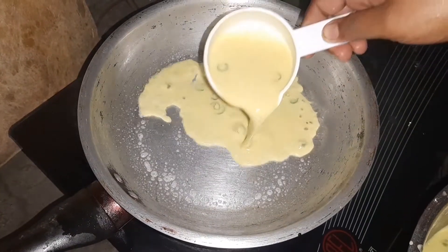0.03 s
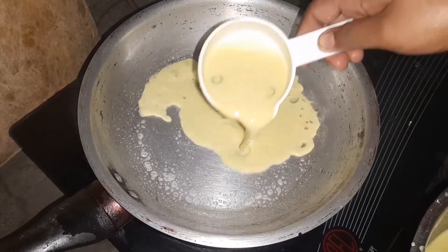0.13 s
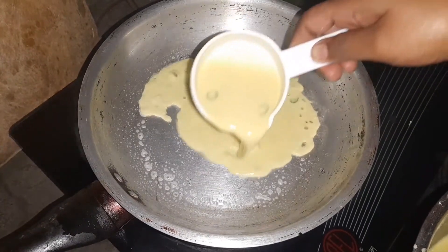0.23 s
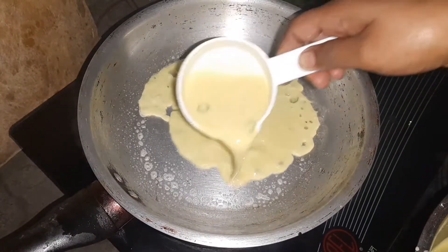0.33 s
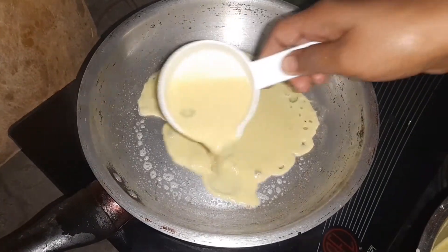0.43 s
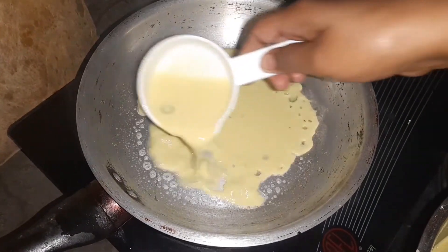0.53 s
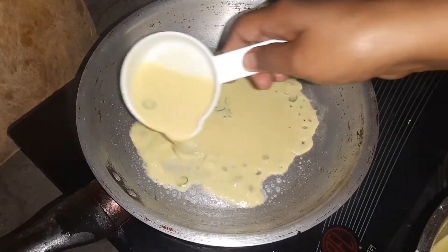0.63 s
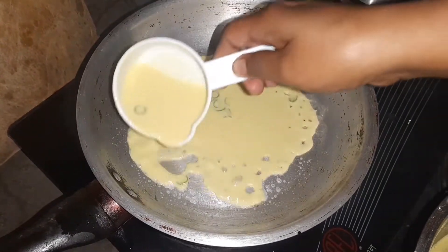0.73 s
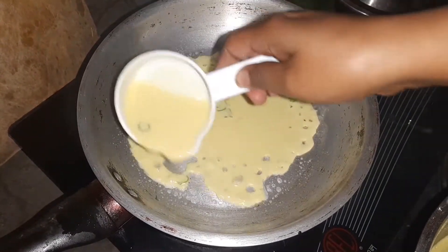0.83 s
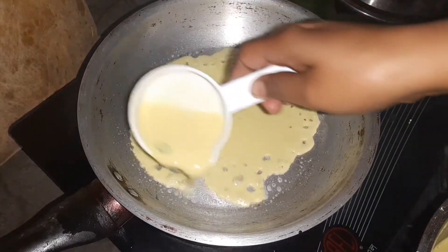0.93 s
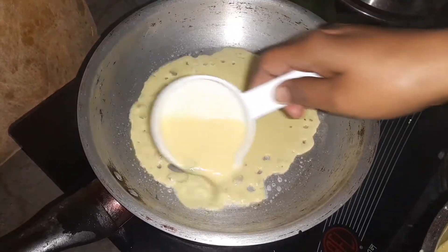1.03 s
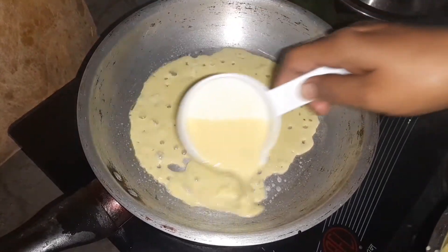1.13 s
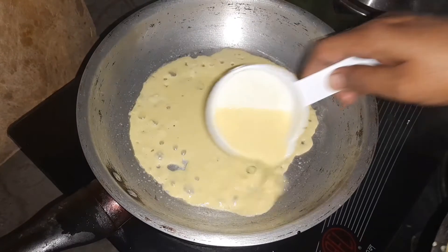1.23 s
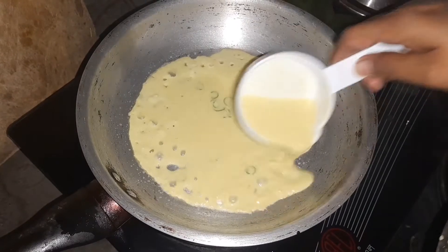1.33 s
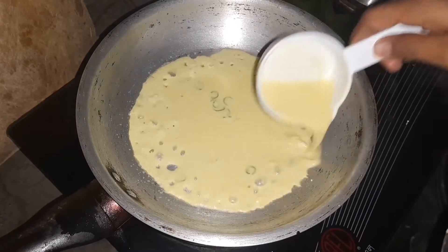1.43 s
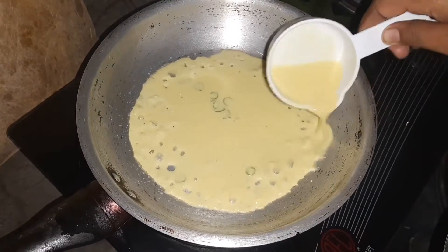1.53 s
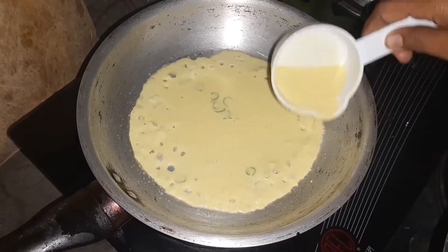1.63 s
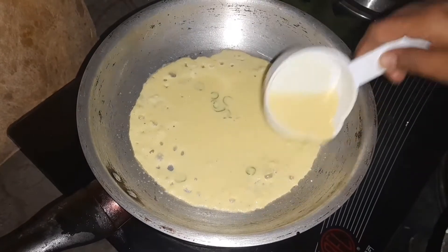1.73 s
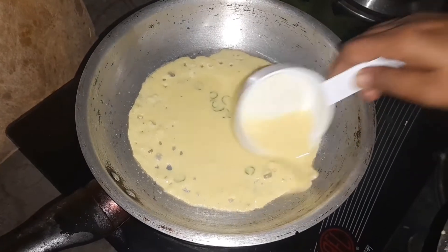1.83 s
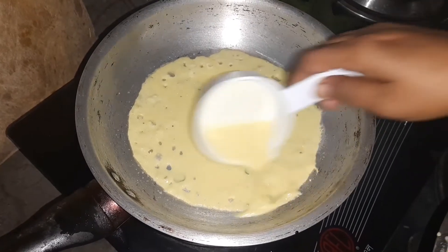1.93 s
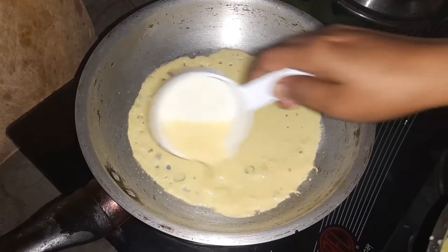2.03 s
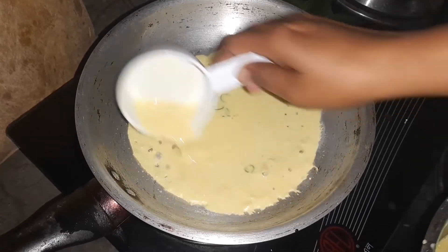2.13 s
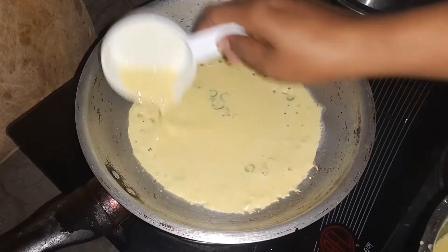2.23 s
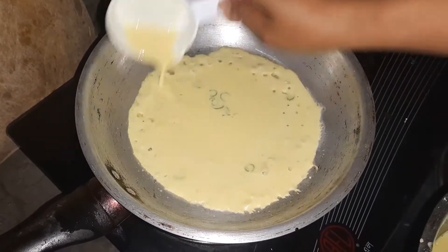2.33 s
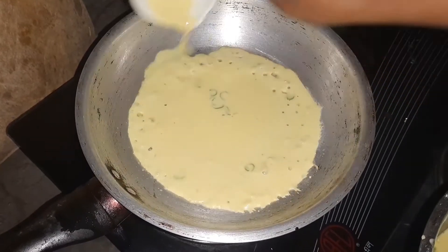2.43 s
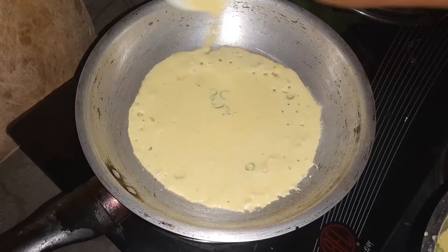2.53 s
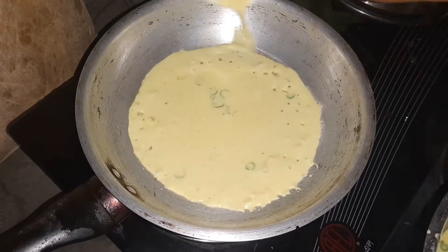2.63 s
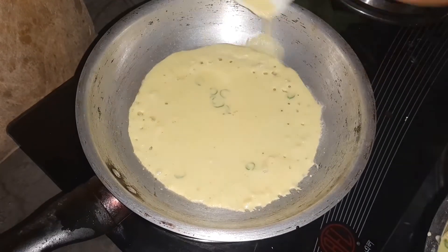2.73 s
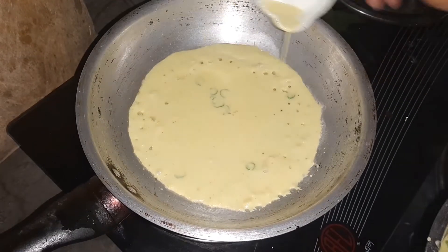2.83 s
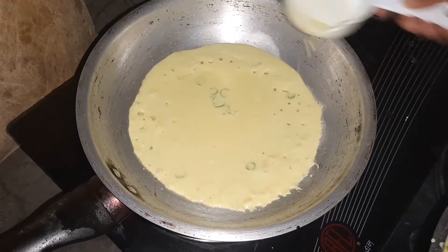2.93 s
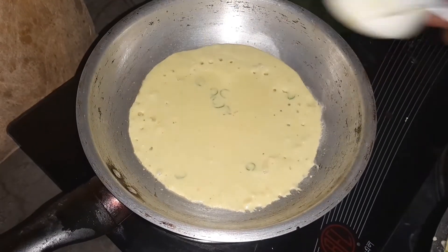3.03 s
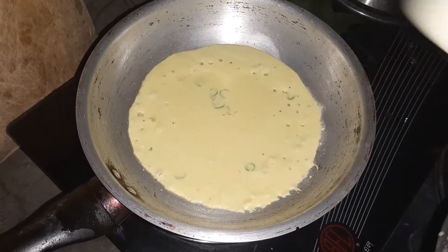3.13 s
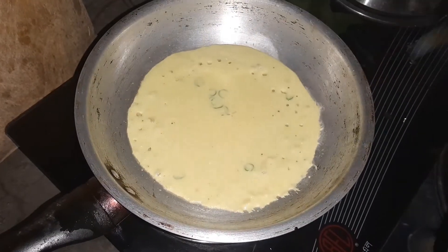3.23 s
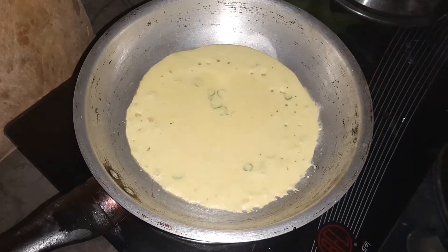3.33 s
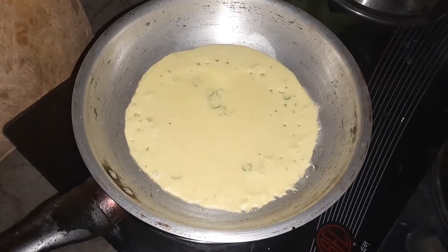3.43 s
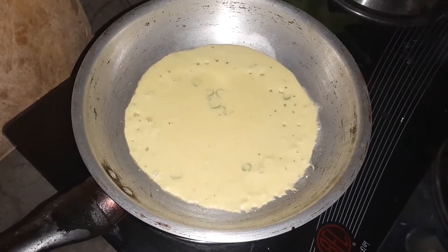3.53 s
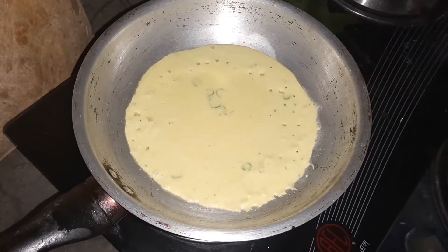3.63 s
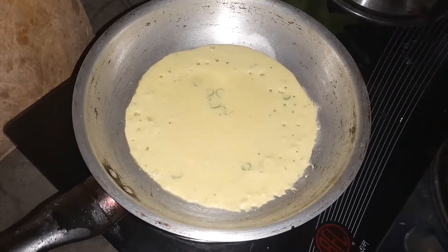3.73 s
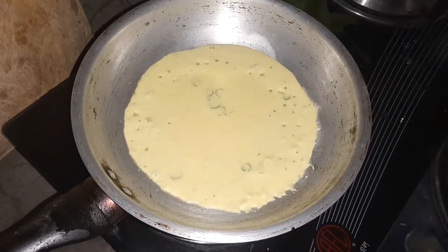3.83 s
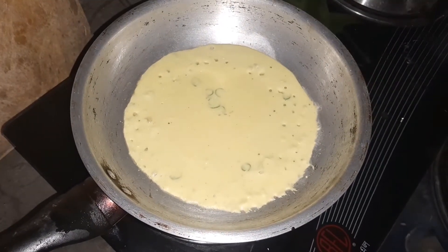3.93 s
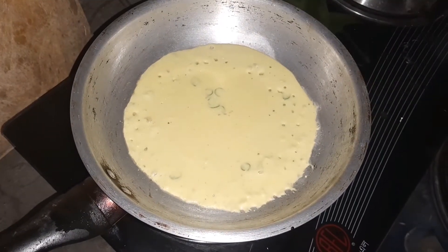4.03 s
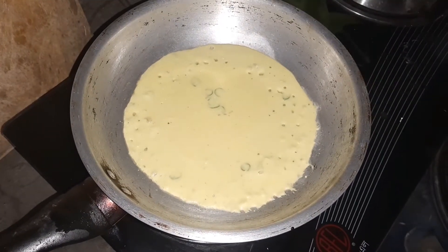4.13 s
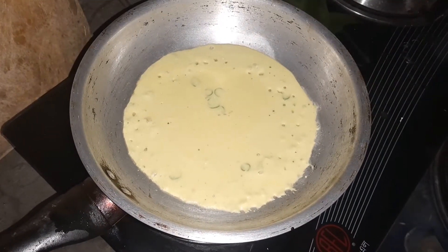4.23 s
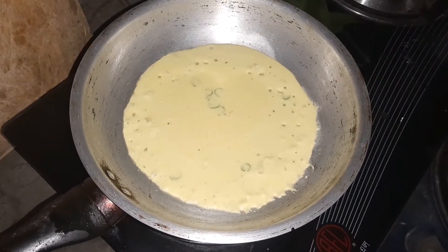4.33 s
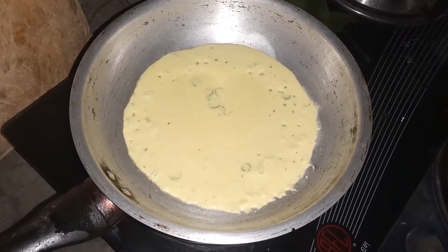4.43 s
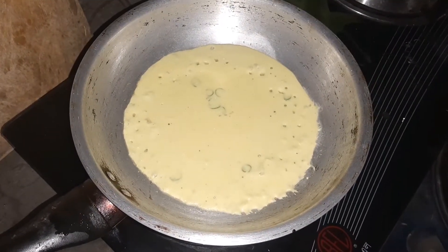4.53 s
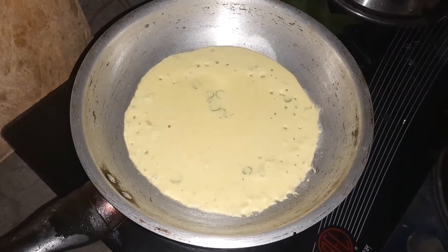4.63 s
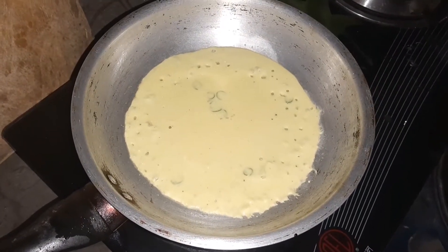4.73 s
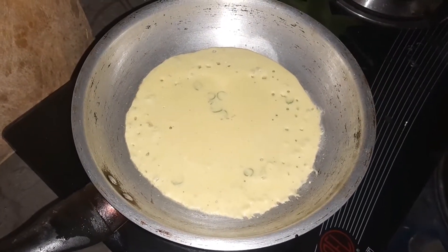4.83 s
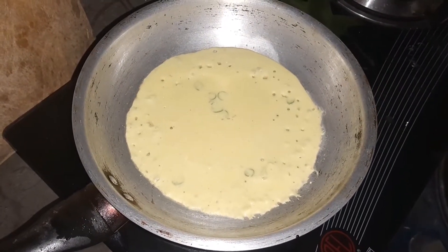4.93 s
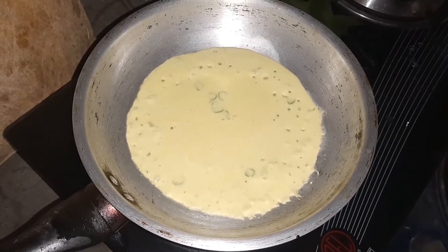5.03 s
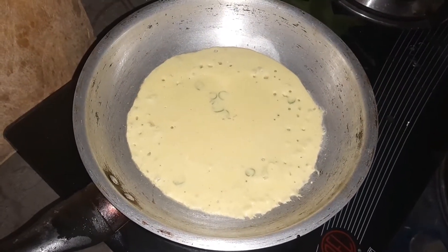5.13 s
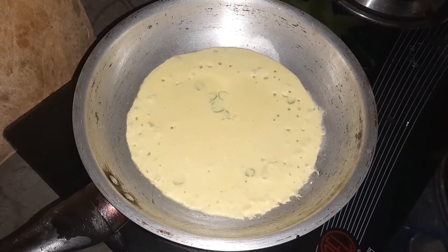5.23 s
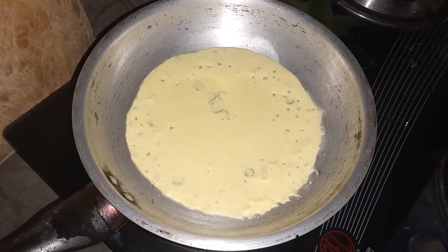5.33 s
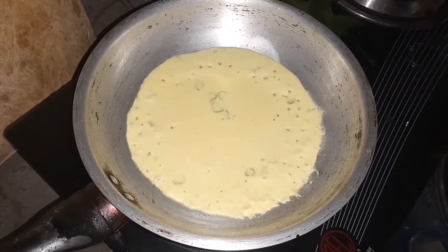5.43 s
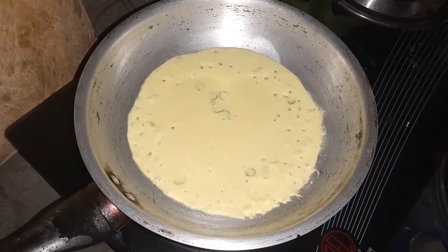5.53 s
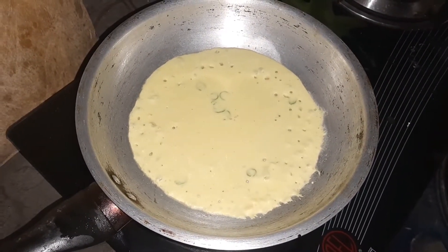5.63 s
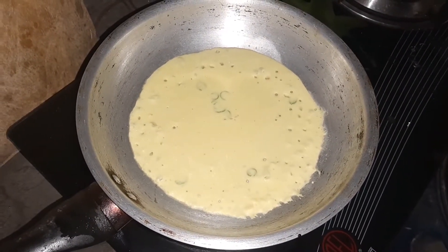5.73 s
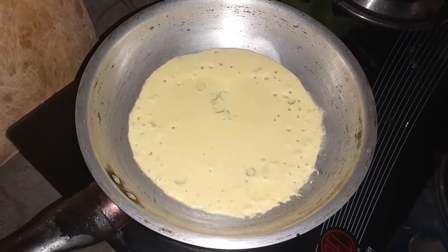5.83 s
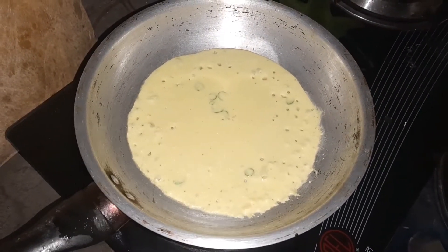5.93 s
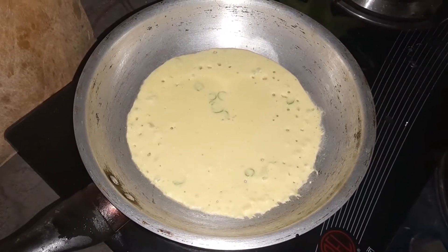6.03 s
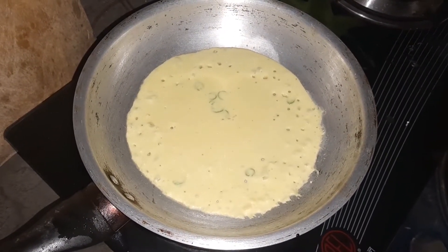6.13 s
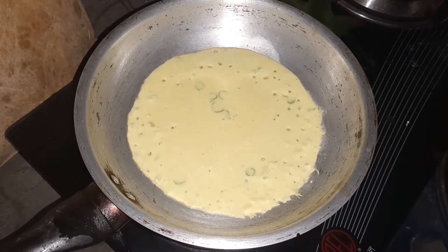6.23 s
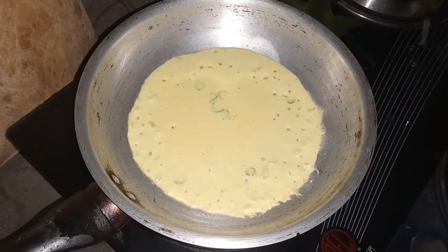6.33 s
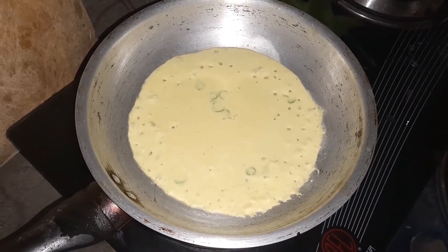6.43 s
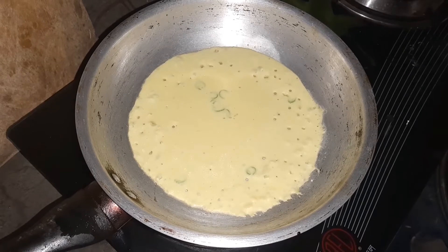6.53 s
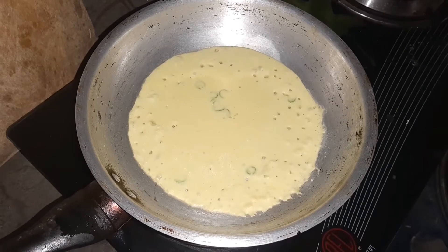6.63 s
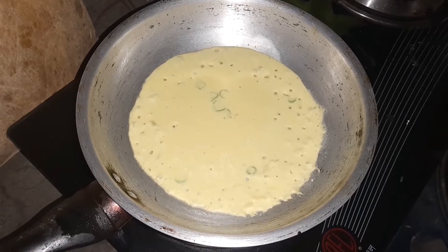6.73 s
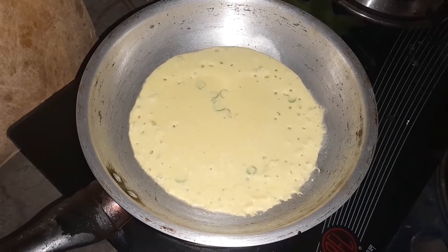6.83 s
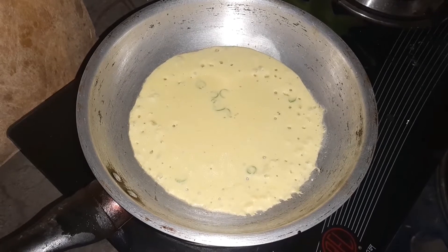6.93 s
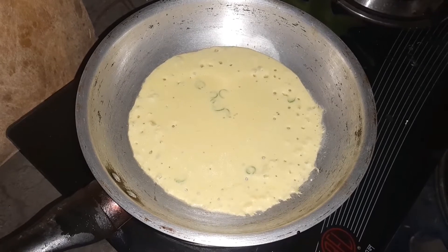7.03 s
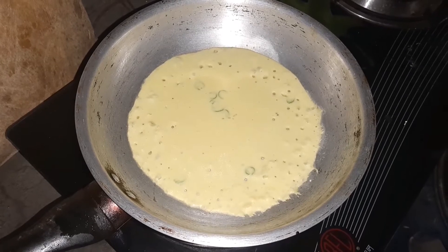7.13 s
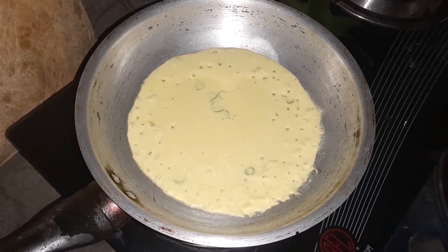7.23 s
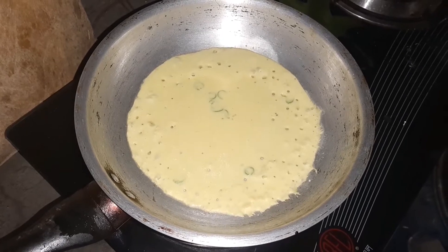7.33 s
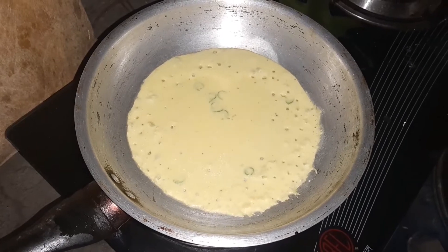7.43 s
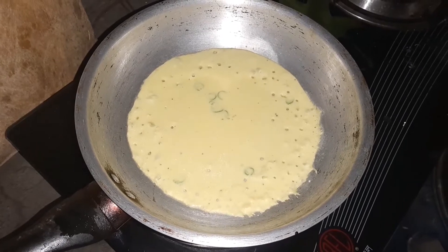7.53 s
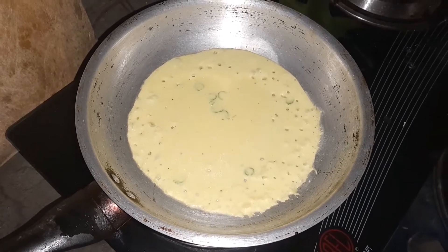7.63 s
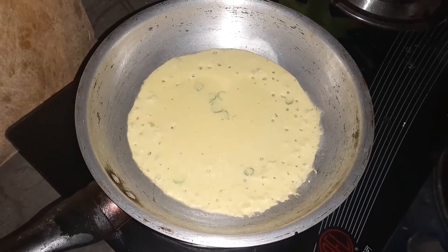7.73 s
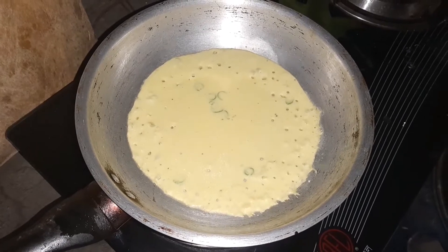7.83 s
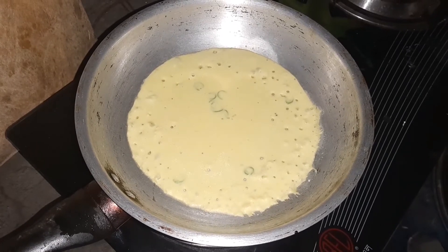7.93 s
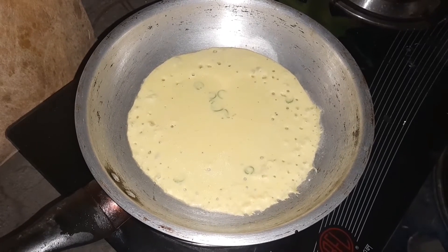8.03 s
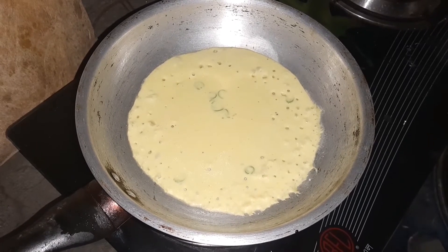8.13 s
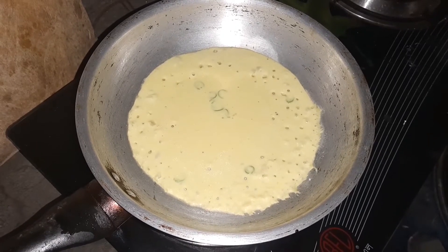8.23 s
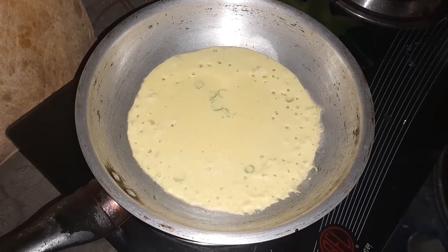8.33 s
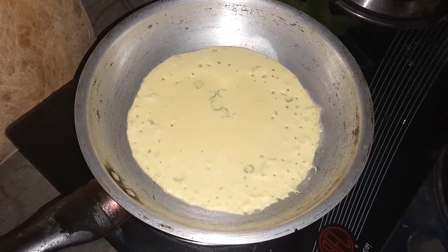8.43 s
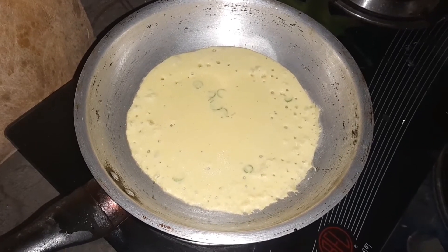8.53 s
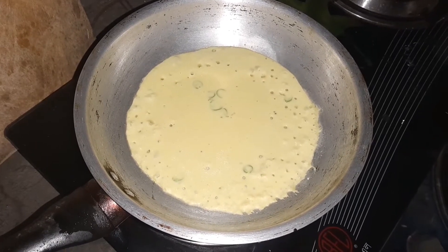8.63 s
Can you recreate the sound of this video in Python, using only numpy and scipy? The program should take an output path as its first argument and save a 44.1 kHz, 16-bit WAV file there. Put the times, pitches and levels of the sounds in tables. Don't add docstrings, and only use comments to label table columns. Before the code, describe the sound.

A bright, steamy sizzle fills the start as batter spreads in a hot pan. After a dip and one last strong burst it falls away, leaving scattered spitting vents, then tiny dry snaps at the rim. A cup bumps dully on the counter midway; the camera case clicks and thuds. Low room rumble and slight microphone hiss lie beneath. Heard close, from just above the pan in a small kitchen.

```python
import sys
import numpy as np
from scipy import signal
from scipy.fft import rfft, irfft, next_fast_len
from scipy.io import wavfile
from scipy.ndimage import uniform_filter1d

SR = 44100
rng = np.random.default_rng(int(sys.argv[2]) if len(sys.argv) > 2 else 0)


def put_to_file(sound):
    columns = np.atleast_2d(sound).T
    safe = np.clip(columns, -1, 1)
    whole_steps = np.round(safe * 32767)
    wavfile.write(sys.argv[1], SR, whole_steps.astype(np.int16))


def nominal_scale(level):
    x = np.asarray(level, float) / 20
    return 10 ** x


N = 383669
T = np.arange(N) / SR

# f/Hz, level/dB per Hz
KITCHEN_RUMBLE = [(15, -40), (25, 4.5), (70, 5.5), (134, -3), (236, -8.5), (290, 0.5), (452, -11),
                  (1010, -18), (1500, -24), (1950, -31), (3300, -120)]
# f/Hz, level/dB per Hz
PORT_HISS = [(300, -82), (2000, -77.5), (6000, -74.5), (10000, -72.5), (15000, -79.5)]
# t/s, length/s, f/Hz
FAR_SCRAPES = [(.38, .5, 235), (5.378, .04, 1500), (5.64, .14, 480), (8.24, .09, 1900), (2.33, .06, 170),
               (3.625, .1, 335), (3.63, .05, 420), (4.43, .17, 700), (4.76, .2, 330), (5.34, .04, 1900),
               (5.89, .1, 1600), (6.84, .1, 330), (7.11, .12, 395), (7.332, .025, 2500), (7.56, .4, 8700),
               (7.75, .7, 8500), (7.2, .07, 335), (7.24, .07, 385), (6.03, .22, 320)]
# width/Hz, level/dB
FAR_RESONANCES = [(109, -57), (900, -67.5), (300, -74), (1500, -76), (40, -69.5), (30, -68), (40, -73),
                  (14, -76), (150, -71.5), (900, -67), (400, -69.5), (80, -76), (50, -75.5), (3000, -51.5),
                  (1300, -65), (2400, -67.5), (40, -71), (30, -70), (400, -69)]

# t/s, peak level/dB, f/Hz, t60/s
LOW_JOLTS = [(3.769, -54, 300, .015), (3.772, -53, 80, .06), (5.38, -52, 90, .12),
             (5.426, -42.5, 88, 0.24), (5.464, -47, 94, .2), (5.646, -57, 90, .08),
             (6.007, -48, 200, 0.023), (6.0222, -49, 330, 0.013), (6.023, -49.5, 120, 0.044),
             (6.055, -62, 60, .12), (6.121, -52, 61.6, 0.18), (6.195, -59, 70, .1), (6.8, -60, 90, 0.062),
             (7.319, -61, 100, 0.044), (7.35, -61, 90, .04), (7.819, -52, 200, 0.022),
             (7.826, -43.5, 78, 0.054)]
# t/s, peak level/dB, f/Hz, t60/s
CASE_TICKS = [(3.864, -49, 2250, 0.014), (4.211, -43, 1680, 0.01), (4.225, -47, 2170, 0.0089),
              (4.433, -47.5, 1920, 0.013), (4.487, -50, 1900, .01), (4.845, -46.5, 2000, 0.0067),
              (5.679, -44, 1490, 0.0017), (6.0164, -35, 1200, 0.0015), (6.019, -38, 1500, 0.0019),
              (6.0217, -26.5, 1610, 0.0018), (6.1224, -32.5, 736, 0.0033), (6.1223, -36.5, 2600, 0.0023),
              (6.7913, -29.5, 2400, 0.004), (6.7925, -31, 4300, 0.0034), (6.7945, -34, 1040, 0.0035),
              (6.7993, -21, 1300, 0.00075), (6.908, -43, 2380, 0.0042), (6.96, -39, 1300, 0.0017),
              (7.3176, -28, 3000, 0.0013), (7.8186, -56, 1600, 0.0048), (7.8216, -46, 2400, 0.0035),
              (8.041, -52, 1630, 0.012), (8.085, -58, 1800, 0.009)]
# t/s, peak level/dB, centre of the push f/Hz, t60/s
CUP_BUMPS = [(3.769, -47.5, 400, .05), (5.38, -40, 200, 0.11), (5.403, -43, 200, 0.16),
             (5.427, -45.5, 120, 0.2), (5.468, -43, 200, 0.18), (5.5, -50, 180, 0.29),
             (5.637, -53, 300, 0.12), (5.652, -48, 250, 0.15), (5.678, -51, 190, 0.18),
             (5.715, -55, 180, 0.22), (6.964, -57, 500, 0.12), (7.351, -47, 350, 0.05)]
# f/Hz, level/dB
COUNTER_MODES = [(77, -3), (101, 5), (135, -4), (167, 4), (207, -5), (245, 1.5), (355, 3.5), (605, -1),
                 (720, -10), (920, 4), (1200, -3), (1700, -23)]

# t/s, peak level/dB, centre f/Hz, opening pop over the blow/dB
WET_SPITS = [(1.474, -21, 4500, 18), (1.5594, -18.5, 4000, 15), (1.6256, -31, 4440, 14),
             (1.8434, -22, 4610, 21), (2.0413, -28, 3940, 20), (2.186, -23, 4500, 17),
             (2.2898, -20, 4000, 27), (2.302, -22.5, 3550, 16.5), (2.375, -26, 3790, 20),
             (2.392, -26, 6170, 16.5), (2.4368, -22, 4920, 16.5), (2.822, -24, 5000, 22),
             (2.9326, -20, 5280, 19), (3.3847, -35.5, 5390, 14.5), (3.402, -31, 6000, 22),
             (3.498, -37, 6000, 22), (3.5806, -35, 4830, 12), (3.6292, -27, 3550, 13),
             (3.755, -42, 4440, 12), (3.816, -45, 5130, 16.5), (3.864, -33.5, 5120, 19.5),
             (4.0324, -57, 6270, 16.5), (4.0886, -50, 5350, 21), (4.143, -28, 6000, 24),
             (4.177, -35, 5190, 21), (4.21, -34, 4600, 21), (4.2255, -34, 6000, 20),
             (4.3167, -41, 6520, 15), (4.4318, -38.5, 4790, 14), (4.4867, -39.5, 5670, 15),
             (4.565, -53, 6380, 20), (4.6179, -43, 4630, 23), (4.6495, -36, 5660, 13.5),
             (4.6754, -46, 4960, 16.5), (4.6931, -35.5, 4540, 17.5), (4.7414, -30.5, 5360, 21),
             (4.801, -43, 4430, 13), (4.9871, -35, 4470, 16.5), (5.013, -39, 5380, 14),
             (5.195, -37.5, 4840, 16.5)]
# t/s, peak level/dB, centre f/Hz, opening pop over the blow/dB
RIM_SNAPS = [(5.3124, -46, 6650, 16), (5.605, -40, 4850, 16), (5.6521, -46, 5040, 17.5),
             (5.804, -39.5, 4280, 16.5), (5.841, -45, 5020, 16), (6.151, -39, 5320, 19),
             (6.1908, -42.5, 5290, 16), (6.2207, -41, 5570, 17.5), (6.387, -33, 4960, 29),
             (6.4118, -37, 9290, 17.5), (6.536, -40, 4890, 16), (6.5717, -34, 6570, 22),
             (6.6637, -36, 5670, 30), (6.763, -49, 4030, 13), (6.8773, -42, 5170, 17.5),
             (6.966, -34, 4580, 18), (7.013, -42, 8490, 18), (7.1028, -40.5, 5150, 17.5),
             (7.1287, -45, 6310, 15), (7.215, -44, 6520, 16), (7.334, -34, 5000, 3),
             (7.3395, -35.5, 5000, 3), (7.381, -39, 4710, 16), (7.5527, -36, 6000, 22),
             (7.7865, -36, 5270, 19), (7.858, -37.5, 4590, 15.5), (7.926, -47, 5000, 20),
             (7.969, -40, 5340, 17.5), (8.06, -45, 5500, 20), (8.265, -47, 3500, 12),
             (8.4874, -40, 4220, 22), (8.5486, -37, 9310, 19), (8.609, -37.5, 6560, 23),
             (8.6904, -38, 4270, 21)]
# t/s, peak level/dB, centre f/Hz, opening pop over the blow/dB
BLISTERS = [(3.1204, -37, 3660, 12), (3.25, -36, 2900, 12), (3.497, -45, 1480, 17), (3.8995, -47, 1850, 12),
            (3.9594, -49, 2280, 10), (4.0627, -48, 2100, 12), (4.0881, -42, 1790, 9),
            (4.6174, -46, 2300, 12), (4.6379, -46, 2100, 12), (4.81, -52, 2100, 12),
            (7.1761, -61, 2120, 12), (7.2579, -54, 2450, 12), (7.3821, -47, 1520, 15),
            (7.435, -49, 1970, 12), (7.653, -47, 3020, 12), (7.667, -45, 3620, 12)]

# f/Hz, level/dB per Hz
OPEN_STEAM = [(35, -64), (60, -37.5), (171, -19.5), (215, -19.5), (442, -7), (627, -10), (930, -6),
              (1080, -9), (1330, -3.5), (2100, -8.5), (3930, -2.5), (5570, -3.5), (7360, -8), (9280, 0),
              (15500, -27.5)]
# f/Hz, level/dB per Hz
RIM_STEAM = [(120, -22), (200, -15), (283, -26), (462, -8), (905, -15), (1050, -18), (1510, -8.5),
             (2510, -6.5), (4330, 0.5), (5900, 0.5), (6460, -0.5), (7610, -5.5), (9470, 2.5),
             (12200, -11.5), (15500, -26)]
# f/Hz, width/Hz, level/dB
PAN_RESONANCES = [(445, 61, 2), (587, 30, 7), (630, 30, -5), (709, 25, 4), (927, 45, 6), (1030, 90, -9),
                  (1480, 330, 3), (1672, 55, -10), (1771, 60, 5), (2005, 30, 5), (2140, 150, -5),
                  (2300, 80, 2.5), (2660, 60, -3), (2860, 50, 3), (3060, 90, -3), (3190, 70, 3),
                  (3553, 40, 3), (3681, 25, 4), (3910, 60, 3), (4420, 280, 2.5), (4750, 120, -2),
                  (5085, 80, 2), (9900, 500, -1)]
# f/Hz, half width/Hz, level/dB
WALL_GAP = [(986, 56, 11), (1270, 130, -3.5), (6500, 110, 2), (400, 120, -9)]
# low f/Hz, high f/Hz
BUBBLE_BANDS = [
    (60, 1160),
    (1100, 2730),
    (2700, 7420),
    (7500, 17000),
]
# level at full flow/dB, growth with flow, with wetness, with fineness (dB per dB)
BUBBLE_JETS = [
    (-45, 1.22, 1.03, 0.55),
    (-40.5, 1.077, 0.43, -0.6),
    (-33, 1.031, 0.052, -0.27),
    (-40.5, 1, -0.061, 0.63),
]
BUBBLE_PUFFINESS = [0.25, 1.34, 0.72, 0.98]
# t/s, steam flow level/dB, wetness/dB, fineness of the vents/dB
BOIL_CURVE = [(0, -33, 1, 1.3), (0.538, -32.5, 1.5, -1.5), (1.402, -32.5, -5.5, -2),
              (1.83, -39.5, -4, -0.3), (2.35, -44.5, -3, -2.5), (2.42, -40.5, -6.5, -2.5),
              (2.47, -29.5, -14, -3), (2.62, -33, -10, 3), (2.82, -39, 2, -0.1), (3.05, -46, -2, -2.5),
              (3.5, -53, -1.5, -4), (4.02, -58, -5, -5), (4.12, -53, 1.5, -2.5), (4.4, -59.5, -1.5, -3.5),
              (5.5, -62.5, 0.5, -0.5), (7.2, -65, 6, 0.5), (7.7, -62.5, -1.5, -3), (8.7, -64, -13, -2.5)]
# t/s, flow level/dB, wetness/dB
BOIL_SURGES = [(.16, -0.5, 1.5), (.24, -1, -2.5), (.53, 3, -5), (.74, 2, -4.5), (.97, 2, -5.5),
               (1.1, -1, 0), (1.47, 1, 2), (1.56, -1.5, 4), (1.93, 3.5, 1.5), (2.05, 3.5, 1),
               (2.93, 0, 2.5), (3.62, 5.5, 1.5), (3.76, -2.5, 11), (4.21, 1.5, -1.5), (4.63, 0.5, 7.5),
               (4.77, -2, 5), (5.42, 4, -6), (6.04, 2, 10.5), (6.33, 3, -7), (6.77, 1.5, 6), (7.27, 2, 4)]
# t/s, share 0-1
PUFF_SHARE = [(0, 0), (1.5, 0.13), (2.3, 0.31), (2.48, 0), (3, 0.23), (3.6, 0.23), (4.5, 0.38), (5.5, 0.3),
              (8.7, 0.25)]

# f/Hz, side minus mid level/dB
SCATTER_WIDTH = [(60, -22), (200, -42), (380, -22.5), (700, -26), (1290, -36), (2380, -33), (4400, -26.5),
                 (8120, -33), (15000, -33)]
# t/s, left minus right level/dB
CAMERA_LEAN = [
    (0, -1.4),
    (4.5, 0.56),
    (6.7, -1.7),
    (7.5, -.3),
    (8.7, -1),
]


def unit(x):
    return x / np.sqrt(np.mean(x ** 2) + 1e-20)


def along(points, hz):
    f, v = np.transpose(points)
    return np.interp(np.log(hz + 1), np.log(f + 1), v)


def over_time(points):
    return np.interp(T, *np.transpose(points))


def filtered(x, response):
    m = next_fast_len(x.shape[-1] + 8192)
    gain = response(np.fft.rfftfreq(m, 1 / SR))
    return irfft(rfft(x, m) * gain, m)[..., :x.shape[-1]]


def add(track, s, sound):
    part = track[round(s * SR):][:len(sound)]
    part += sound[:len(part)]


def kitchen():
    rumble = lambda hz: nominal_scale(along(KITCHEN_RUMBLE, hz))
    mid, side = [unit(filtered(rng.standard_normal(N), rumble)) for _ in range(2)]
    return nominal_scale(-79.5) * (mid + nominal_scale(-26) * side * [[1], [-1]])


def port_hiss():
    return filtered(rng.standard_normal((2, N)), lambda hz: nominal_scale(along(PORT_HISS, hz)))


def far_scrapes():
    out, t = np.zeros(N), np.arange(SR) / SR
    for (s, length, hz), (width_hz, db) in zip(FAR_SCRAPES, FAR_RESONANCES):
        drag = filtered(rng.standard_normal(SR), lambda f: 1 / (1 + (2 * (f - hz) / width_hz) ** 2))
        if width_hz < 60:
            drag = drag / np.abs(signal.hilbert(drag)) ** 0.75
        swell = np.sin(np.pi * np.clip(t / length, 0, 1) ** 0.72)
        add(out, s, nominal_scale(db) * unit(drag) * swell)
    return out


def jolts():
    out, t = np.zeros(N), np.arange(SR // 4) / SR
    onset = 1 - np.exp(-t / 0.0006)
    for s, db, hz, t60 in LOW_JOLTS:
        add(out, s, nominal_scale(db - 60 * t / t60) * np.cos(2 * np.pi * hz * t) * onset)
    return out


def ticks():
    out, t = np.zeros(N), np.arange(SR // 50) / SR
    for s, db, hz, t60 in CASE_TICKS:
        add(out, s, nominal_scale(db + 3 - 60 * t / t60) * np.sin(2 * np.pi * hz * t + 0.093))
    return filtered(out, lambda f: f ** 2 / (f ** 2 + 220 ** 2) / (1 + (f / 7000) ** 6))


def bumps():
    out, t = np.zeros(N), np.arange(SR // 2) / SR
    hz, mode_db = np.transpose(COUNTER_MODES)[:, :, None]
    scuff_db, scuff_t60_s = -10, 0.11
    for s, db, centre_hz, t60 in CUP_BUMPS:
        reach_db = -5 * np.log(hz / centre_hz) ** 2 + rng.normal(0, 2, hz.shape)
        decay_db = -60 * t / t60 * (hz / 100) ** 0.45
        swing = np.sin(2 * np.pi * (hz * t + rng.random(hz.shape)))
        ring = (nominal_scale(mode_db + reach_db + decay_db) * swing).sum(axis=0)
        ring *= 1 - np.exp(-t / 0.00017)
        grit = nominal_scale(-60 * t / scuff_t60_s) * rng.standard_normal(len(t))
        scuff = filtered(grit, lambda f: 1 / (1 + (f / 1500) ** 4))
        add(out, s, nominal_scale(db) * (ring / np.abs(ring).max() + nominal_scale(scuff_db) * scuff))
    return out


def pan_colour(hz, steam, ring):
    lifts_db = sum(db / (1 + (2 * (hz - c) / w) ** 2) for c, w, db in PAN_RESONANCES)
    return nominal_scale(along(steam, hz) + ring * lifts_db)


def vent_bursts(events, t60_s, narrow_db):
    out, t = np.zeros(N), np.arange(SR // 8) / SR
    for s, db, hz, pop_db in events:
        blow = nominal_scale(-60 * t / t60_s) * rng.standard_normal(len(t))
        blow[6] -= nominal_scale(pop_db)
        size = lambda f: nominal_scale(-narrow_db * np.log((f + 1) / hz) ** 2) / (1 + (f / 14000) ** 8)
        blow = filtered(blow, lambda f: pan_colour(f, RIM_STEAM, ring=0.24) * size(f))
        add(out, s, nominal_scale(db - 3) * blow / np.abs(blow).max())
    return out


def spits():
    wet = vent_bursts(WET_SPITS, t60_s=0.083, narrow_db=10)
    dry_snaps = vent_bursts(RIM_SNAPS, t60_s=0.051, narrow_db=7)
    return wet + dry_snaps + vent_bursts(BLISTERS, t60_s=0.04, narrow_db=35)


def rim_dip(hz):
    return nominal_scale(-8 / (1 + ((hz - 2850) / 300) ** 2))


def wall(hz):
    return nominal_scale(sum(db / (1 + ((hz - c) / w) ** 2) for c, w, db in WALL_GAP))


def bursts(count, spread_db, t60):
    when, size = rng.random(count), np.minimum(rng.exponential(size=count), 3.2)
    kicks = np.bincount((when * N).astype(int), nominal_scale(2 * spread_db * size), N)
    power = signal.lfilter([1], [1, -nominal_scale(-120 / (t60 * SR))], kicks)
    return np.abs(power) / np.mean(power)


def patches(x, patchy_db):
    z = signal.stft(x, nperseg=256)[2]
    field = uniform_filter1d(rng.standard_normal(z.shape), size=4, axis=0)
    field = unit(uniform_filter1d(field, size=24, axis=1))
    return signal.istft(z * nominal_scale(patchy_db * np.clip(field, -2, 2)), nperseg=256)[1][:N]


def boil():
    s, *controls = np.transpose(BOIL_CURVE)
    flow, wet, fine = [np.interp(T, s, c) for c in controls]
    rise_s, fall_s, full_flow_db = 0.0092, 0.093, -33
    for start, flow_db, wet_db in BOIL_SURGES:
        surge = np.exp(np.minimum((T - start) / rise_s, (start - T) / fall_s))
        flow, wet = flow + flow_db * surge, wet + wet_db * surge
    return [db + a * (flow - full_flow_db) + b * wet + c * fine for db, a, b, c in BUBBLE_JETS]


def sizzle():
    levels = boil()
    sparse = np.clip(over_time(PUFF_SHARE), 0, 0.95)
    covered = np.clip((-42.5 - levels[2]) / 12, 0, 1)
    shared = bursts(count=500, spread_db=1.5, t60=0.034)
    crackle = bursts(count=9000, spread_db=0, t60=0.0012)
    pops = bursts(count=350, spread_db=0, t60=0.0022)
    texture = 0.89 + 0.21 * crackle + 0.09 * (0.14 + covered) * pops
    out = np.zeros(N)
    for db, (low_hz, high_hz), puffy in zip(levels, BUBBLE_BANDS, BUBBLE_PUFFINESS):
        vents = 0.24 * shared + 0.7 * bursts(count=500, spread_db=6.5, t60=0.06)
        power = np.abs(1 + puffy * sparse * (vents - 1)) * texture
        jet = patches(rng.standard_normal(N), patchy_db=0.98) * np.sqrt(power)
        band = lambda hz: ((1 + (low_hz / (hz + 1)) ** 16) * (1 + (hz / high_hz) ** 16)) ** -0.5
        open_colour = lambda hz: band(hz) * pan_colour(hz, OPEN_STEAM, ring=0.8)
        rim_colour = lambda hz: band(hz) * pan_colour(hz, RIM_STEAM, ring=0.2) * rim_dip(hz) * wall(hz)
        bare, rim = unit(filtered(jet, open_colour)), unit(filtered(jet, rim_colour))
        out += nominal_scale(db) * ((1 - covered) * bare + covered * rim)
    return out


def thinning(x):
    s, *_, fine = np.transpose(BOIL_CURVE)
    lift = nominal_scale(0.59 * np.interp(T, s, fine)) - 1
    return x + lift * filtered(x, lambda hz: 1 / (1 + ((hz - 6340) / 2200) ** 4))


def shrinking(x):
    middle_s, length_s = 7.7, 0.48
    late = np.clip((T - middle_s) / length_s + 0.5, 0, 1)
    dip = lambda hz: nominal_scale(-7.5 / (1 + ((hz - 2300) / 340) ** 2)) / rim_dip(hz)
    return (1 - late) * x + late * filtered(x, dip)


def scene():
    near = shrinking(thinning(sizzle())) + spits() + ticks() + jolts() + far_scrapes()
    t = np.arange(SR // 25) / SR
    scatter = rng.standard_normal(len(t)) * nominal_scale(-60 * t / 0.07)
    scattered = signal.fftconvolve(near, scatter / np.linalg.norm(scatter))[:N]
    side = patches(filtered(scattered, lambda hz: nominal_scale(along(SCATTER_WIDTH, hz))), patchy_db=5)
    leaning = near * nominal_scale(over_time(CAMERA_LEAN) * [[0.5], [-0.5]])
    counter = bumps() * nominal_scale([[-0.6], [0.6]])
    return leaning + side * [[1], [-1]] + counter + port_hiss() + kitchen()


def low_pass(x):
    return signal.sosfilt(signal.butter(12, 15620, fs=SR, output="sos"), x)


def record(dry):
    heard = filtered(dry, lambda hz: (hz < 15720) / np.sqrt(1 + (60 / (hz + 1)) ** 4))
    return low_pass(heard)


dry = scene()
out = record(dry)
put_to_file(out)
```